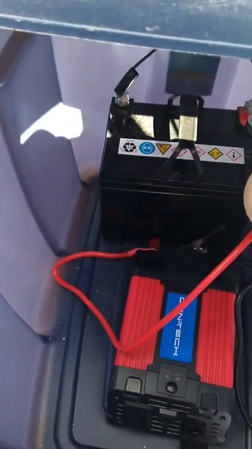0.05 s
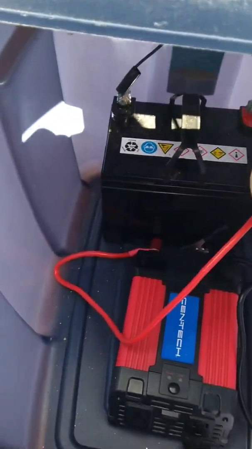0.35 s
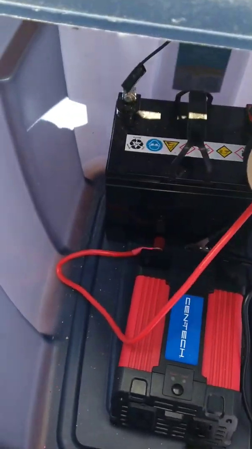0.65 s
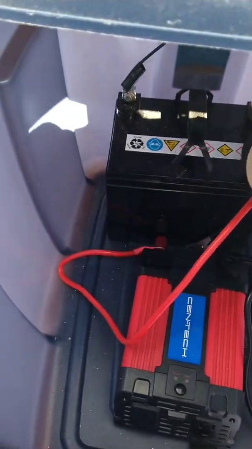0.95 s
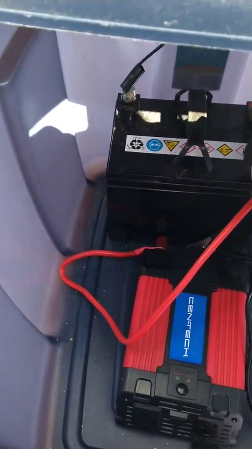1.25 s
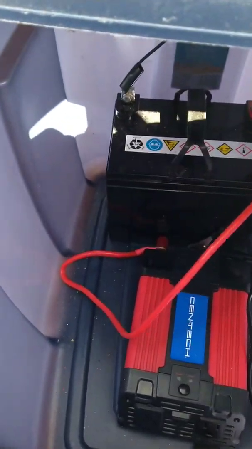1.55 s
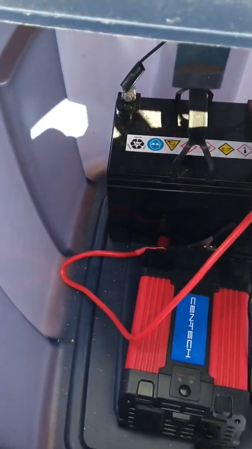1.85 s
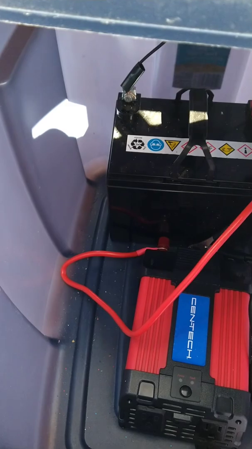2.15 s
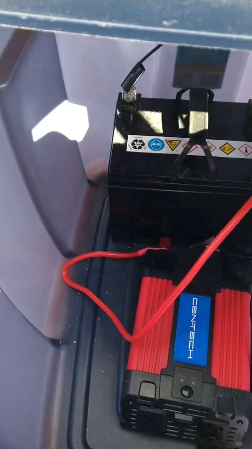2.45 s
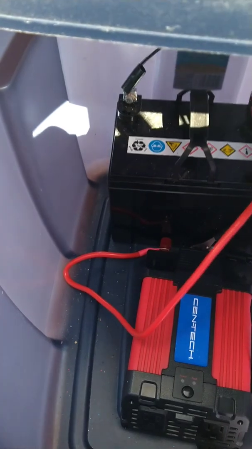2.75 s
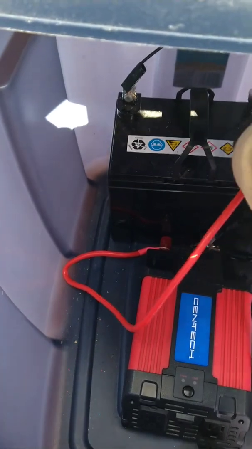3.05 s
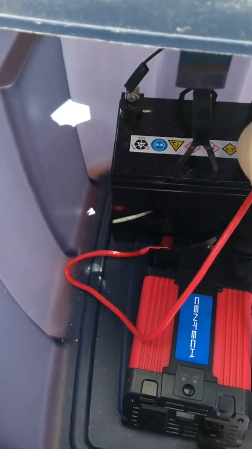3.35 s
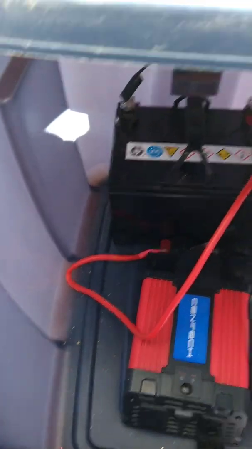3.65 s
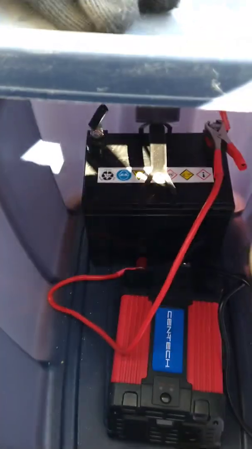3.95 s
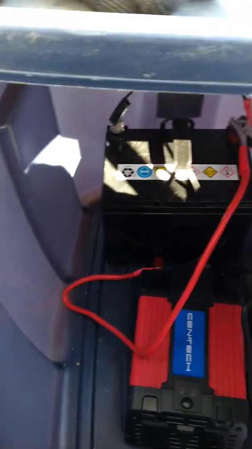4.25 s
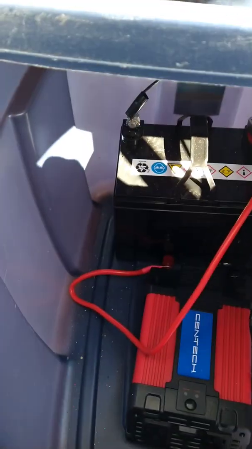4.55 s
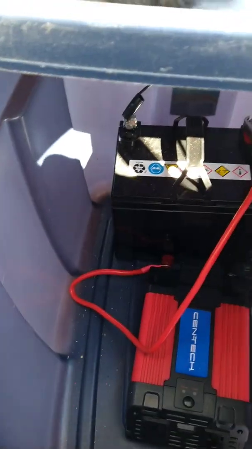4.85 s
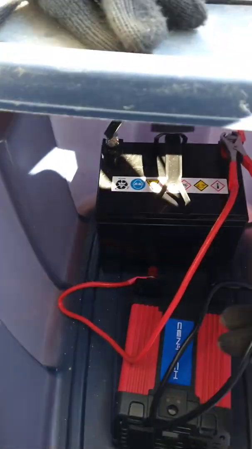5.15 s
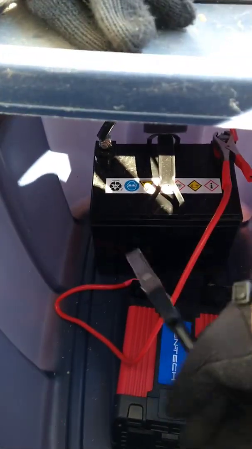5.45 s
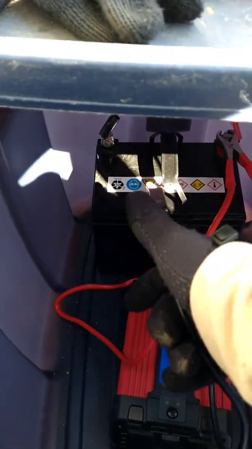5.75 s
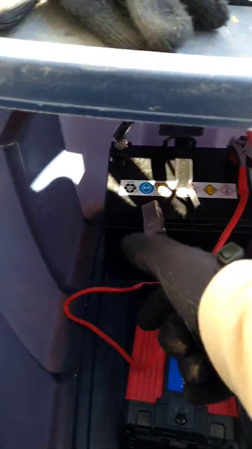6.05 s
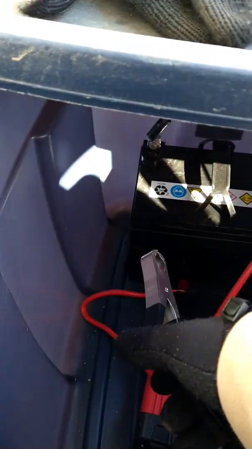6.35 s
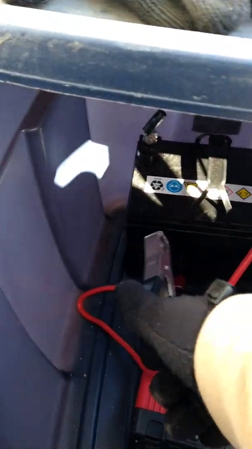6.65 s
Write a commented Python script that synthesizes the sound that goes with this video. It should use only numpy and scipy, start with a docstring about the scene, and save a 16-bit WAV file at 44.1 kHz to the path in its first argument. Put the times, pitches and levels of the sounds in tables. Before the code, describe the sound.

Close clicks, short scrapes and hollow knocks as cable clamps are handled at a battery inside a plastic tub.

```python
"""Spring clamps on stiff cables, worked onto a battery that stands with an inverter in a plastic tub.
Close up, the jaws click and grind on the posts; clamps and cables knock against case and tub.
Each contact force rings the tub's walls and booms its floor. Springs and cable sheaths tick,
sleeves and cables rustle; a faint outdoor rumble and hum lie underneath."""
import sys
import numpy as np
from scipy import signal
from scipy.fft import rfft, irfft, next_fast_len
from scipy.io import wavfile

SR = 44100
rng = np.random.default_rng(int(sys.argv[2]) if len(sys.argv) > 2 else 0)


def transcribe(u):
    """Save the signal u as a 16-bit wav file named by the first command-line argument.

    u: samples, shape (n,) or (channels, n), limited to [-1, 1]; the rate is SR.
    q: integer samples, one column per channel.
    """
    v = np.clip(np.atleast_2d(u).T, -1, 1)
    q = np.round(v * 32767).astype(np.int16)
    wavfile.write(sys.argv[1], SR, q)


N = 304218
BLOW_S = .02  # a blow's level is its energy spread over this time

# left/right likeness: freq_hz, correlation
STEREO_CORRELATION = [(30, .7), (100, .96), (400, .88), (900, .75), (1400, .5), (2200, -.15), (5000, -.1),
                      (14000, 0)]
# left minus right: freq_hz, gain_db
STEREO_BALANCE = [(30, 3), (110, -1), (700, 1.2), (2000, 1.8), (5000, 3.4), (9000, 6), (15000, 5)]
# outdoor rumble: freq_hz, density_db
RUMBLE_SPECTRUM = [(15, -16), (35, -4.5), (65, 2.5), (110, 0), (150, -9), (185, -6), (290, -13),
                   (450, -16.5), (700, -21), (1200, -36), (3000, -38.5), (8000, -38.5), (15000, -34.5)]
# distant hum: pitch_hz, level_db
HUM_PARTIALS = [(62, -81), (120, -81.5), (180, -85.5), (240, -83.5), (356, -85)]
# cloth noise: freq_hz, density_db
CLOTH_SPECTRUM = [(200, 2.5), (600, -1), (1500, 0), (3000, -1), (4500, -3.5), (6200, -5), (8000, -10),
                  (11000, -18.5), (15000, -24)]
# sleeve and cable rustle: time_s, relative_db
RUSTLE_ENVELOPE = [(0.01, -83.5), (0.15, -87.5), (0.66, -77), (1.21, -82), (1.91, -80), (2.46, -84),
                   (2.5, -79.5), (3.21, -71.5), (3.65, -80.5), (3.85, -74), (4.36, -78), (4.46, -72.5),
                   (4.501, -79.5), (5.21, -71.0), (5.41, -72.5), (6.05, -80), (6.16, -75.5), (6.879, -83)]
# tub floor under the battery: pitch_hz, gain_db, t60_s
TUB_FLOOR_MODES = [(108.1, -5.5, 0.28), (120.1, -8, 0.17), (148.5, -4.5, 0.11), (175.8, -9.5, 0.29),
                   (196.5, -20, 0.24)]
# tub walls and air: pitch_hz, gain_db, t60_s
TUB_WALL_MODES = [(374, -15, .18), (615, -4, .15), (668, -13, .12), (868, -12, .08), (1098, -2, .13),
                  (1412, -11, .13), (1730, -14, .08), (2416, -19, .09), (620, -26, .9), (1050, -25, .9),
                  (1560, -28, .8)]
# decay of the dense modes: freq_hz, t60_s
RING_DECAY = [(120, 0.043), (500, 0.11), (1500, 0.055), (5000, 0.078), (12000, 0.024)]
# colour of the dense modes: freq_hz, gain_db
RING_COLOUR = [(30, -48), (65, -26), (130, -1.5), (200, -4), (275, -16.5), (340, -9.5), (480, 2), (1000, 0),
               (2000, 1), (3100, -2), (5000, 0), (6700, 4), (9000, 1.5), (15000, -10.5)]
# jaws and cables sliding, and springs squeaking: peak_s, swell_s, level_db, contact_ms, spot_hz, spot_lift_db
SLIDES = [(0.02, 0.04, -75, 0.48, 780, 10), (0.68, .012, -84.5, 0.081, 2840, 14.5),
          (0.753, .028, -70, 0.27, 2590, 6), (0.95, 0.075, -73, 0.34, 860, 11.5),
          (0.984, .006, -59.5, 0.21, 850, 12.5), (1.388, 0.041, -75.5, 0.53, 880, 5.5),
          (1.53, 0.017, -73, 0.12, 1870, 2), (1.761, 0.015, -65.5, 0.23, 1680, 4),
          (2.13, 0.045, -74.5, 0.46, 1660, 8), (2.705, 0.008, -65.5, 0.11, 960, 11),
          (2.925, 0.024, -80, 0.31, 4150, 25), (2.961, 0.0082, -56.5, 0.25, 675, 7.5),
          (3.314, 0.024, -56, .38, 1280, 0), (3.92, .1, -77, .45, 1580, 8.5),
          (4.08, .012, -78, 0.16, 2840, 10), (4.551, 0.0079, -55, 0.42, 5400, 9),
          (4.612, .035, -51, 0.28, 243, 21.5), (4.7, .035, -49, .44, 1120, 14),
          (4.759, 0.022, -44, .41, 1055, 15), (4.831, .015, -40, 0.25, 1080, 8.5),
          (5.22, 0.029, -79, 0.11, 3000, 8), (5.443, 0.014, -51, 0.2, 2130, 14),
          (5.869, 0.0068, -80.5, 0.11, 3200, 23.5), (5.994, 0.029, -89, 0.081, 3140, 14.5),
          (6.235, 0.045, -80.5, 0.14, 2140, 10.5)]
# firmer slides move the floor more: level_db, thump_db
SLIDE_THUMP = [(-83, -72.5), (-42.5, -48.5)]
# firmer slides drive the walls more: level_db, coupling
SLIDE_COUPLING = [(-56.5, .2), (-48.5, .9)]
# clearest ticks of springs and sheaths: start_s, relative_db, pitch_hz
CLEAR_TICKS = [(0.584, -63, 1280), (1.3659, -56, 4730), (1.713, -67, 4560), (2.0453, -65.5, 2100),
               (2.2447, -60.5, 2170), (2.6544, -60.5, 3750), (2.7804, -63.5, 3370), (2.825, -69, 4300),
               (2.8525, -63, 4450), (3.7338, -65, 3130), (3.8608, -57, 3670), (4.434, -62.5, 1560),
               (6.528, -60.5, 5900)]
# soft nudges on the floor: start_s, level_db
NUDGES = [(0.606, -57), (1.116, -55), (1.861, -46), (4.024, -55), (4.406, -59.5), (4.775, -47.5),
          (4.844, -44.5), (5.451, -33), (5.695, -58)]
# clicks, taps and knocks: start_s, level_db, thump_db, contact_ms, spot_hz
BLOWS = [(0.705, -61, -62, 0.17, 1370), (0.9847, -61, -57, 0.24, 5400), (1.274, -66.5, -84, 0.095, 805),
         (1.534, -60.5, -58, 0.28, 1830), (1.788, -43, -38.5, 0.33, 1300), (2.529, -70.5, -57.5, 0.34, 820),
         (2.674, -63.5, -62.5, 0.095, 960), (2.883, -59.5, -61, 0.12, 1320), (2.942, -63, -77, 0.29, 1380),
         (3.24, -62, -52, 0.31, 192), (3.284, -57, -49, 0.68, 1190), (3.328, -62.5, -46, 0.14, 960),
         (3.469, -46.5, -43, .41, 1350), (3.571, -69, -61, 0.49, 1050), (4.566, -36, -39, 0.43, 220),
         (4.604, -42.5, -45.5, 0.34, 1370), (4.6661, -29, -46, 0.39, 1000), (5.394, -44, -37.5, 0.26, 1125),
         (5.4233, -35.5, -37, .22, 630), (5.66, -57, -44.5, 0.3, 900), (6.638, -66, -56, 0.41, 900)]
# lighter blows bring out the struck spot more: level_db, spot_lift_db
BLOW_SPOT_LIFT = [(-67, 12), (-41.5, 9)]


def undb(db):
    """Decibels to gain."""
    return 10 ** (np.asarray(db) / 20)


def at(points, hz):
    """Read (freq_hz, value) points on a log-frequency axis."""
    f, value = np.transpose(points)
    return np.interp(np.log(hz), np.log(f), value)


def bins_hz(size):
    """FFT bin frequencies, floored at 1 Hz."""
    return np.maximum(np.fft.rfftfreq(size, 1 / SR), 1)


def unit(x):
    """Scale to a mean energy of one per channel."""
    return x / np.sqrt(np.mean(np.sum(x ** 2, axis=-1)))


def fade(t, t60_s):
    """Exponential decay."""
    return np.exp(-np.log(1000) * t / t60_s)


def add(out, start_s, sound):
    """Mix a sound in at start_s."""
    i = int(start_s * SR)
    out[:, i:i + sound.shape[-1]] += sound[..., :N - i]


def walk(rate_hz):
    """Random drift, deviation near one."""
    return 1.2 * np.interp(np.arange(N) / SR * rate_hz, np.arange(4096), rng.standard_normal(4096))


def stereo_noise(f):
    """Left and right noise spectra: alike in the bass, unrelated and leaning left in the treble."""
    mid, side = rng.standard_normal((2, len(f))) + 1j * rng.standard_normal((2, len(f)))
    alike = np.clip(at(STEREO_CORRELATION, f), -.99, .99)
    sign = np.array([[1], [-1]])
    balance = undb(sign * at(STEREO_BALANCE, f) / 2)
    return (mid * np.sqrt(1 + alike) + sign * side * np.sqrt(1 - alike)) * balance


def coloured_noise(spectrum):
    """Steady stereo noise, rms one."""
    f = bins_hz(2 * next_fast_len(N // 2 + 1))
    return unit(irfft(stereo_noise(f) * undb(at(spectrum, f)))[:, :N]) * np.sqrt(N)


def resonance(f, hz, width_hz):
    """One damped mode, unity gain at its centre."""
    return 1 / (1 + 1j * (f * f - hz * hz) / (f * width_hz))


def minimum_phase(x, gain):
    """Causal filter: rings only after its input."""
    cepstrum = irfft(np.log(gain))
    half = len(cepstrum) // 2
    cepstrum[1:half] *= 2
    cepstrum[half + 1:] = 0
    return irfft(rfft(x) * np.exp(rfft(cepstrum)))


def outdoors(rumble_db=-69, swell_db=1, waver_rad=0.078):
    """Low rumble with a faint wavering hum."""
    t, hum = np.arange(N) / SR, 0
    for hz, db in HUM_PARTIALS:
        amplitude = undb(db + 2 * walk(9)) * np.sqrt(2)
        hum += amplitude * np.sin(2 * np.pi * hz * t + waver_rad * walk(19))
    return coloured_noise(RUMBLE_SPECTRUM) * undb(rumble_db + swell_db * walk(4.2)) + hum


def rustle(gain_db=3, flutter_db=-0.46, grain_db=2):
    """Cloth and cable sheaths brush in fine grains as the arm moves."""
    db = gain_db + np.interp(np.arange(N) / SR, *np.transpose(RUSTLE_ENVELOPE))
    return coloured_noise(CLOTH_SPECTRUM) * undb(db + flutter_db * walk(54) + grain_db * walk(500))


def scrapes(slips_per_s=1500, scatter_db=4, lead_s=0.0049, fall_ratio=0.97, size=24576):
    """Teeth and springs catch and slip in quick uneven steps that swell and die away."""
    out = np.zeros((2, N))
    for peak_s, swell_s, db, contact_ms, spot_hz, lift_db in SLIDES:
        thump_db = np.interp(db, *np.transpose(SLIDE_THUMP))
        coupling = np.interp(db, *np.transpose(SLIDE_COUPLING))
        start_s, fall_s = max(peak_s - 4 * swell_s, 0), fall_ratio * swell_s
        t = np.arange(size) / SR + start_s - peak_s + lead_s
        slips = (rng.random(size) < slips_per_s / SR) * rng.choice([-1, 1], size)
        slips = slips * undb(scatter_db * rng.standard_normal(size))
        pressure = np.exp(-np.abs(t / np.where(t < 0, swell_s, fall_s)) ** 1.6)
        sound = tub(slips * pressure, contact(db, thump_db, contact_ms), spot_hz, lift_db, coupling)
        add(out, start_s, sound * np.sqrt((swell_s + fall_s) * SR))
    return out


def contact(db, thump_db, contact_ms, rise_db_per_oct=4, fall_db_per_oct=19.5):
    """Contact spectrum (freq_hz, level_db): rises with pitch, falls steeply above 1 / contact time."""
    hz = np.array([900, 4800, 11500])
    rise_db = rise_db_per_oct * np.log2(hz / hz[0])
    fall_db = 10 * np.log10(1 + (hz * contact_ms / 1000) ** (fall_db_per_oct / 3))
    return [(140, thump_db), *zip(hz, db + rise_db - fall_db)]


def tub(force, spectrum, spot_hz, lift_db, coupling, spot_width_ratio=0.14, ring_db=-4):
    """Response to a contact: dense ring coloured by the struck spot, clear wall modes, floor boom."""
    f = bins_hz(len(force))
    thump_db, clack_db = spectrum[0][1], spectrum[1][1]
    spot_mode = resonance(f, spot_hz, max(spot_width_ratio * spot_hz, 80))
    spot = np.abs(1 + (undb(lift_db) - 1) * spot_mode)
    colour = undb(at(spectrum, f) + at(RING_COLOUR, f) + ring_db)
    ring = minimum_phase(dense_ring(force), colour * spot)
    walls = coupling * undb(clack_db) * modes(force, TUB_WALL_MODES, stereo_spread=0.1)
    floor = undb(thump_db) * floor_boom(force)
    fade_out = np.minimum(np.linspace(4, 0, len(force)), 1)
    return (ring + walls + floor) * fade_out


def dense_ring(force, tail_db=-41, tail_t60_s=0.84):
    """Dense fast-dying modes with a faint tail; each octave has equal energy and its own decay."""
    t, f = np.arange(len(force)) / SR, bins_hz(len(force))
    noise, drive, ring = stereo_noise(f), rfft(force), 0
    for hz in 125 * 2 ** np.arange(8):
        band = irfft(noise * np.cos(np.pi / 2 * np.minimum(np.abs(np.log2(f / hz)), 1)))
        decay = fade(t, at(RING_DECAY, hz)) + undb(tail_db) * fade(t, tail_t60_s)
        ring += unit(irfft(drive * rfft(band * decay)))
    return ring


def modes(force, table, stereo_spread, skirt_ratio=0.61):
    """Driven panel modes, each radiating near its own pitch, with its own gain and phase per channel."""
    f, drive, out = bins_hz(len(force)), rfft(force), 0
    for hz, db, t60_s in table:
        channels = 1 + stereo_spread * np.array([[1], [-1]]) * np.exp(2j * np.pi * rng.random())
        mode = resonance(f, hz, np.log(1000) / (np.pi * t60_s))
        radiation = resonance(f, hz, skirt_ratio * hz)
        out += undb(db) * unit(irfft(drive * channels * mode * radiation))
    return out


def floor_boom(force, yield_s=0.00022):
    """The loaded tub floor gives way slowly and swings in a few low modes."""
    softened = signal.lfilter([1], [1, -np.exp(-1 / (yield_s * SR))], force)
    return modes(softened, TUB_FLOOR_MODES, stereo_spread=0.28)


def ticks(t60_s=0.002, width_ratio=0.67, echo_db=-20, echo_t60_s=0.018, gain_db=22, size=4096):
    """Springs and sheaths snap: one broad resonance and a trace of the tub's echo."""
    out, t, f = np.zeros((2, N)), np.arange(size) / SR, bins_hz(size)
    decay = fade(t, t60_s) + undb(echo_db) * fade(t, echo_t60_s)
    for start_s, db, hz in [*CLEAR_TICKS, *faint_ticks()]:
        snap = irfft(stereo_noise(f)) * decay
        tick = irfft(rfft(snap) * resonance(f, hz, width_ratio * hz) ** 2)
        add(out, start_s, undb(db + gain_db) * unit(tick))
    return out


def faint_ticks(count=14, relative_db=-72, scatter_db=2, pitch_hz=4500, scatter_oct=.5):
    """Sheaths creak at random: rows of start_s, relative_db, pitch_hz."""
    start_s = rng.random(count) * (N - 1) / SR
    loud, high = rng.standard_normal((count, 2)).T
    return zip(start_s, relative_db + scatter_db * loud, pitch_hz * 2 ** (scatter_oct * high))


def bumps(push_s=0.0029, size=16384):
    """A soft push reaches only the floor modes."""
    out, t = np.zeros((2, N)), np.arange(size) / SR
    push = t * np.exp(-t / push_s)
    for start_s, db in NUDGES:
        add(out, start_s, undb(db) * floor_boom(push) * np.sqrt(BLOW_S * SR))
    return out


def knocks(chatter_s=0.0015, chatter_db=-1, coupling=.55, size=24576):
    """Each blow is one sharp push, then the jaws chatter for a few milliseconds."""
    out, t = np.zeros((2, N)), np.arange(size) / SR
    for start_s, db, thump_db, contact_ms, spot_hz in BLOWS:
        chatter = rng.standard_normal(size) ** 3 * t * np.exp(-t / chatter_s)
        force = undb(chatter_db) * unit(chatter)
        force[0] += 1  # the push
        lift_db = np.interp(db, *np.transpose(BLOW_SPOT_LIFT))
        sound = tub(force, contact(db, thump_db, contact_ms), spot_hz, lift_db, coupling)
        add(out, start_s, sound * np.sqrt(BLOW_S * SR))
    return out


def scene():
    """Clamp and cable handling over the outdoor background."""
    return knocks() + scrapes() + bumps() + ticks() + rustle() + outdoors()


def record(dry):
    """Steep low-pass at 15.8 kHz."""
    return signal.sosfilt(signal.ellip(10, .2, 70, 15800, fs=SR, output="sos"), dry)


dry = scene()
out = record(dry)
transcribe(out)
```